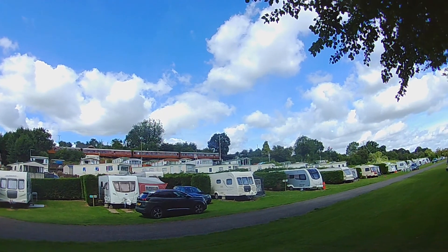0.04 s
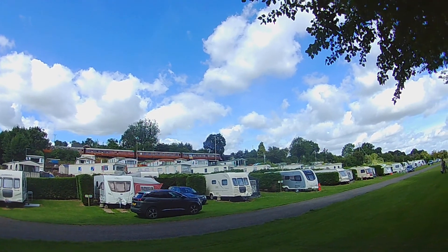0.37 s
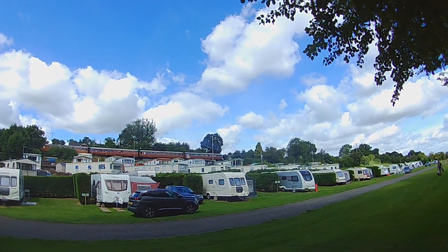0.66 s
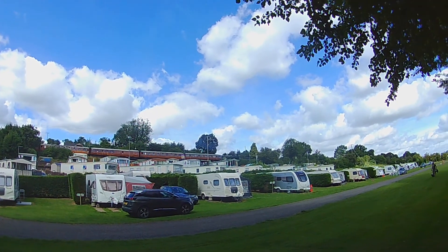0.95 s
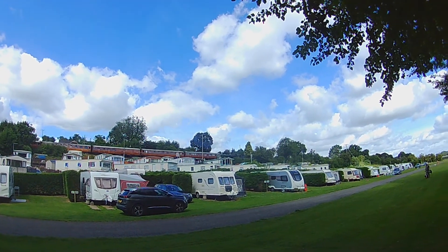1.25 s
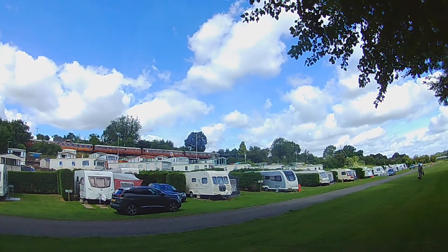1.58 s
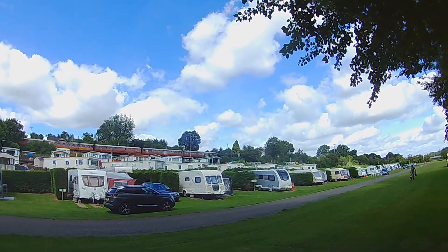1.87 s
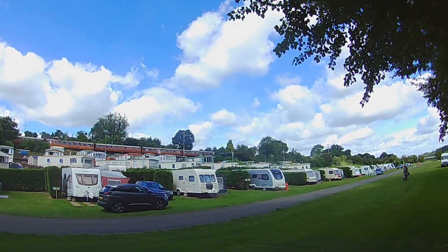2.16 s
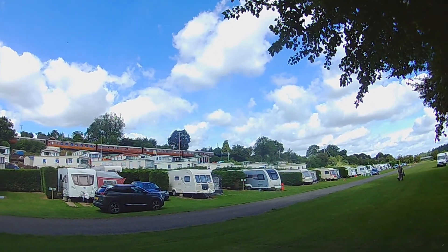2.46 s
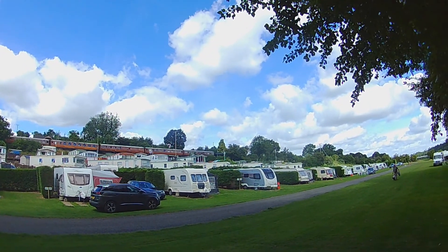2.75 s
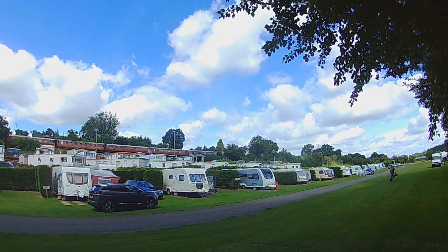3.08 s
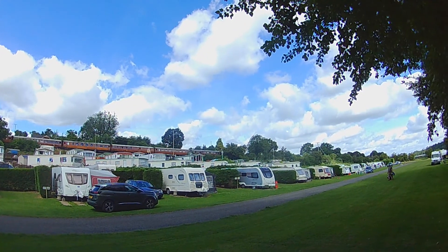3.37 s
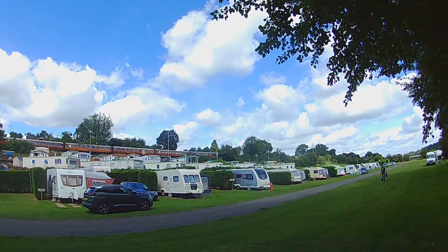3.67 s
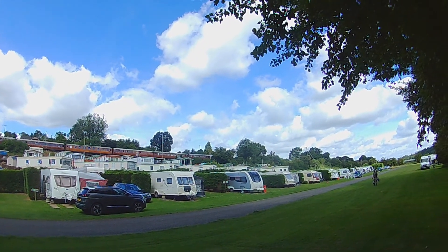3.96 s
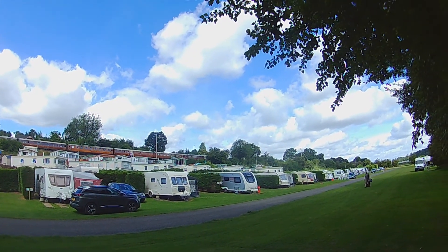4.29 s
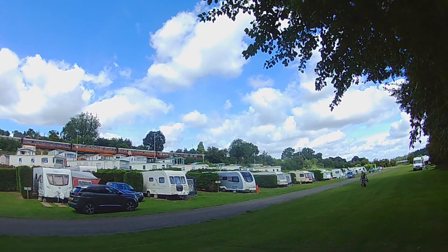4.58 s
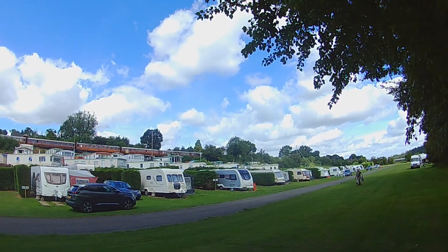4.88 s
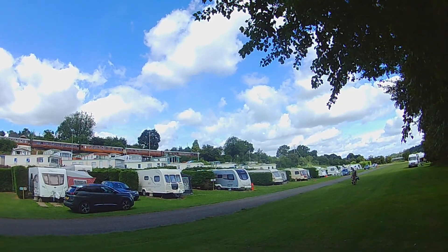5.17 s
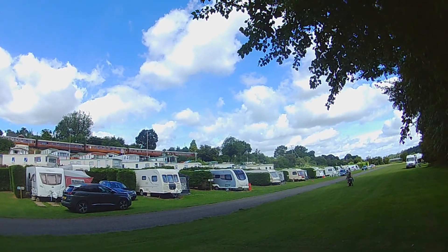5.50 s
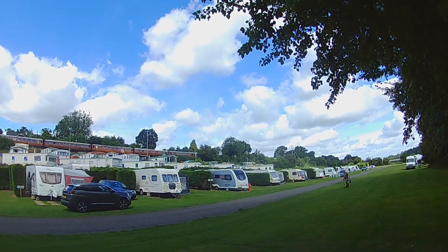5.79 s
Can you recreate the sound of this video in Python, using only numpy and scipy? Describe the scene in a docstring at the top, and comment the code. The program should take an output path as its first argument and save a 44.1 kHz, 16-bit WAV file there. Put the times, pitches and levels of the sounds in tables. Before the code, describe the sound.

A steam train passes in an open valley, chuffing rapidly over a steady wheel roar, hissing steam, thin wheel squeals and scattered clanks. About halfway through, a loud, breathy steam whistle sounds one long note and then a short toot, while the train noise dips beneath it. The whistle lingers in echoes as the chuffing comes back. A small bird and a breeze on the microphone are barely audible.

```python
"""Eight exhaust beats a second sound over the roar, squeal and clank of a passing steam train.
Each beat is a puff of steam with a boom of the chimney air. A small bird calls in a faint breeze.
Steam then drives the whistle's bell into resonance: a long blast and a short toot, which linger
as reflections in the valley. An automatic gain control lowers everything from just before the
whistle until just after it."""
import sys
import numpy as np
from scipy import signal
from scipy.fft import rfft, irfft, next_fast_len
from scipy.io import wavfile
from scipy.ndimage import uniform_filter1d, minimum_filter1d, map_coordinates

SR = 44100
rng = np.random.default_rng(int(sys.argv[2]) if len(sys.argv) > 2 else 0)


def output_pcm(signal):
    """Save a mono or channel-first signal as 16-bit PCM at the path in sys.argv[1].

    Samples are clipped to [-1, 1] before scaling.
    """
    pcm = np.clip(np.atleast_2d(signal).T, -1, 1) * 32767
    wavfile.write(sys.argv[1], SR, np.round(pcm).astype(np.int16))


N = 261943

# Spectrum of the exhaust bark and the clanks. Each row: frequency in Hz, relative density in dB.
BARK_SPECTRUM = [(100, -13.5), (220, -7.5), (330, -5.5), (500, 2), (700, -3), (900, -1.5), (1300, -1),
                 (1750, 0.5), (2100, -10), (2800, -25), (4000, -26), (5500, -39.5), (8000, -62),
                 (12000, -66)]
# Running noise. Each row: time in seconds, relative levels of wheel roar and of steam hiss in dB.
RUNNING_LEVELS = [(0, -40.5, -55), (.25, -40.5, -49.5), (.6, -38, -54), (.9, -37.5, -51), (1.6, -40, -55.5),
                  (2.2, -39, -53.5), (2.32, -37, -51), (3.2, -38, -52.5), (5.1, -40, -55),
                  (5.25, -37, -49.5), (5.94, -39.5, -57.5)]
# Pulls of the whistle cord. Each row: start, end, attack and base release T60 in seconds, level in dB.
WHISTLE_PULLS = [(2.96, 4.613, 0.056, .12, -2), (4.694, 4.892, 0.013, 0.25, -3.5)]


def amp(db):
    """Amplitude ratio of a level in decibels."""
    return 10 ** (np.asarray(db) / 20)


def unit(x):
    """The signal normalised to rms 1."""
    return x / np.sqrt(np.mean(x ** 2) + 1e-20)


def along(points, hz):
    """Interpolation of (Hz, value) points on a logarithmic frequency axis."""
    point_hz, values = np.transpose(points)
    return np.interp(np.log(hz + 1), np.log(point_hz + 1), values)


def clock():
    """The time of every sample in seconds."""
    return np.arange(N) / SR


def curves(rows):
    """Linear interpolation in time: one curve for each column after the first."""
    times, *columns = np.transpose(rows)
    return [np.interp(clock(), times, column) for column in columns]


def wobble(rate):
    """Smooth random modulation with rate knots a second."""
    coarse = np.linspace(0, N / SR, N // 20)
    knots = map_coordinates(rng.standard_normal(4096), [coarse * rate], mode="wrap")
    return np.interp(clock(), coarse, knots)


def swell(s, half):
    """A Gaussian pulse of height 1 at time s, down to 1/e at half seconds either side."""
    return np.exp(-((clock() - s) / half) ** 2)


def held(start, end, attack, t60, steep=1):
    """Attack, hold and exponential decay; steep above 1 makes the attack bite later."""
    t = clock()
    return np.clip((t - start) / attack, 0, 1) ** steep * amp(-60 * np.maximum(t - end, 0) / t60)


def bursts(times, levels_db, rise, hold, t60):
    """Envelope of bursts that rise, hold and decay; as incoherent sounds, their powers add."""
    t = np.arange(SR // 2) / SR
    shape = np.minimum(t / rise, 1) * amp(-60 * np.maximum(t - hold, 0) / t60)
    power = np.zeros(N + SR)
    for s, db in zip(times, levels_db):
        power[max(round(s * SR), 0):][:len(t)] += (amp(db) * shape) ** 2
    return np.sqrt(power[:N])


def filtered(x, response):
    """Linear filtering: the spectrum of x times a frequency response."""
    size = next_fast_len(N + SR // 2)
    return irfft(rfft(x, size) * response(np.fft.rfftfreq(size, 1 / SR)), size)[:N]


def noise(spectrum):
    """Noise of rms 1, coloured by (Hz, dB) points."""
    return unit(filtered(rng.standard_normal(N), lambda hz: amp(along(spectrum, hz))))


def partial(phase, scatter, flutter_rate, breath):
    """Multipath tone of rms 1: a direct path, paths scattered by moving air, and a breathy skirt."""
    in_phase = 1 + scatter * wobble(flutter_rate) + breath * wobble(240)
    quadrature = scatter * wobble(flutter_rate) + breath * wobble(240)
    return unit(in_phase * np.cos(phase) + quadrature * np.sin(phase))


def exhaust():
    """Each stroke releases a turbulent bark of steam and excites the chimney's air resonance."""
    # Strength of the exhaust. Each row: time in seconds, relative levels of bark and of boom in dB.
    effort = [(0, -34, -54), (.75, -32, -51), (1.35, -38, -50), (1.8, -34, -45), (2.499, -37.5, -49.5),
              (2.8, -32.5, -48.5), (3.2, -27, -50.5), (3.5, -40, -52.5), (4.6, -38.5, -47.5),
              (5.1, -41.5, -48.5), (5.3, -36, -49), (5.699, -35, -48), (5.94, -52, -59)]
    # The four beats of one turn of the driving wheels. Each row: bark accent and boom accent in dB.
    accents = [(-0.5, -2.5), (-0.5, -0.5), (2.5, 2), (-1.5, -3)]
    beat_s, ease_at_s, boom_lag_s = 0.1252, 4.98, 0.006
    beats = np.arange(int(N / SR / beat_s))
    onsets = 0.003 + beat_s * beats
    onsets += 0.07 * np.maximum(onsets - ease_at_s, 0)  # slower once the driver eases off
    accent_db = np.array(accents)[beats % len(accents)] - 0.35 * rng.standard_normal((len(beats), 2))
    times, *levels = np.transpose(effort)
    bark_db, boom_db = np.array([np.interp(onsets, times, db) for db in levels]) + accent_db.T
    puffs = bursts(onsets, bark_db, rise=0.012, hold=0.026, t60=0.26)
    bark = puffs * noise(BARK_SPECTRUM) * amp(0.55 * wobble(99) - 3.5)
    chimney_hz = 174 + 17 * wobble(40)
    boom = np.sin(2 * np.pi * np.cumsum(chimney_hz) / SR) * amp(0.75 * wobble(30) + 4)
    return bark + bursts(onsets + boom_lag_s, boom_db, rise=0.0093, hold=0.032, t60=0.23) * boom


def wheel_roar():
    """Rolling wheels radiate broadband noise."""
    # Spectrum of the roar. Each row: frequency in Hz, relative density in dB.
    roar_spectrum = [(25, -14.5), (100, -9.5), (170, -4.5), (230, -10), (510, 1.5), (730, -3.5), (870, 3),
                     (1080, -3.5), (1260, 1), (1400, -4), (1730, 0), (2080, -8.5), (2900, -26.5),
                     (9000, -64)]
    roar_db, _ = curves(RUNNING_LEVELS)
    return amp(roar_db - 1.5 + wobble(35)) * noise(roar_spectrum)


def rim_squeal():
    """On the curve the wheel rims sing in two of their natural modes."""
    # Spells of squealing. Each row: start and end in seconds, relative level in dB.
    squeals = [(-.1, 0.47, -41), (0.736, 1.285, -43.5), (2.25, 2.79, -42.5), (2.984, 5.582, -43.5)]
    envelope = sum(amp(db) * held(start, end, attack=0.13, t60=0.35) for start, end, db in squeals)
    low_mode = partial(2 * np.pi * 1262 * clock(), scatter=1.6, flutter_rate=95, breath=0.88)
    high_mode = partial(2 * np.pi * 1738 * clock(), scatter=4.8, flutter_rate=76, breath=0.87)
    return envelope * (amp(-3) * low_mode + amp(-8) * high_mode)


def steam_leak():
    """Turbulence in leaking steam makes a high hiss."""
    # Spectrum of the hiss. Each row: frequency in Hz, relative density in dB.
    hiss_spectrum = [(1200, -15.5), (2650, 5.5), (3100, -2.5), (3400, -0.5), (3600, 2), (3900, 4.5),
                     (4600, -4), (5500, -7.5), (6100, -20), (7000, -20.5), (8200, -39), (10500, -39),
                     (15000, -30)]
    _, hiss_db = curves(RUNNING_LEVELS)
    return amp(hiss_db - 2.5 + 1.3 * wobble(18)) * noise(hiss_spectrum)


def breeze():
    """Air moving past the microphone makes a faint low rumble, with one gust."""
    level_db = -71.5 + 21.5 * swell(3.65, half=0.73) + 1.5 * wobble(12)
    return amp(level_db) * noise([(20, 3.5), (60, -6.5), (110, -11), (250, -28), (1000, -77.5)])


def clanks():
    """Impacts of rods and wheels give quickly damped bursts of noise."""
    # The impacts. Each row: start in seconds, level in dB.
    impacts = [(0.136, -36), (0.222, -33), (0.65, -37.5), (0.83, -37), (0.931, -33), (1.021, -37.5),
               (1.227, -39.5), (2.134, -35), (2.4, -34.5), (2.458, -36.5), (3.094, -27), (5.391, -35),
               (5.567, -35.5), (5.705, -41)]
    return bursts(*np.transpose(impacts), rise=0.0049, hold=0.014, t60=0.079) * noise(BARK_SPECTRUM)


def bird():
    """Each thin call is a frequency-modulated tone that glides upward."""
    # The calls. Each row: start and length in seconds, first and last pitch in Hz, level in dB.
    chirps = [(1.35, 0.088, 5600, 5740, -65), (5.357, 0.12, 6230, 6573, -64)]
    calls = np.zeros(N)
    for start, length, first_hz, last_hz, db in chirps:
        progress = np.clip((clock() - start) / length, 0, 1)
        hz = first_hz + (last_hz - first_hz) * progress + 50 * wobble(120)
        calls += amp(db) * np.sin(np.pi * progress) * np.sin(2 * np.pi * np.cumsum(hz) / SR)
    return calls


def blowing(steep, linger):
    """The bell's resonance builds and decays with each pull; linger multiplies the decay time."""
    return sum(amp(db) * held(start, end, attack, t60 * linger, steep)
               for start, end, attack, t60, db in WHISTLE_PULLS)


def fade_db():
    """Atmospheric fading: the brief losses of the whistle's fundamental in moving air."""
    # The fades. Each row: centre and half length in seconds, depth in dB.
    fades = [(3.879, 0.036, 11.5), (4.274, 0.047, 3), (4.837, 0.062, 11.5)]
    return sum(depth * swell(s, half) for s, half, depth in fades)


def whistle():
    """A steam-blown bell resonates in a harmonic series whose upper partials speak a moment later."""
    # The note sharpens as steam heats the bell. Each row: time in seconds, pitch in Hz.
    pitch = [(2.988, 817), (3.012, 849), (3.04, 827.4), (3.09, 843), (3.18, 849.7), (3.3, 859.4),
             (3.49, 869.6), (3.595, 859.3), (3.75, 871), (3.95, 871), (4.15, 875), (4.4, 867),
             (4.72, 877.5), (4.97, 872)]
    # The overtones. Each row: harmonic number, base level in dB against the fundamental.
    overtones = [(2, -17), (3, -14.5), (4, -19), (5, -29), (6, -34), (7, -42.5), (8, -50), (9, -58.5),
                 (10, -61), (11, -64.5), (12, -68.5)]
    # Swings of the second harmonic. Each row: time in seconds, gain in dB.
    second_gain = [(3, -4), (3.07, 4), (3.21, -5), (3.29, 7), (3.42, -3), (3.57, 0), (3.63, -12), (3.73, 5),
                   (3.85, 2), (3.95, -7), (4.12, 1), (4.56, -5), (4.72, 4)]
    # Swings of the harmonics from the third up. Each row: time in seconds, gain in dB.
    brightness = [(3, -4.5), (3.19, 2), (3.55, -7.5), (3.67, -3), (3.89, -24), (4.06, -10.5), (4.27, -16.5),
                  (4.5, -4.5), (4.7, -12.5), (4.97, -17)]
    ragged = np.interp(clock(), [3.35, 4], [0.38, 1.15])  # grows as the engine draws away
    hz = curves(pitch)[0] * (1 + 0.0022 * ragged * wobble(55))  # unsteady steam wavers the pitch
    phase = 2 * np.pi * np.cumsum(hz) / SR
    fundamental = partial(phase, scatter=0.1 * ragged, flutter_rate=93, breath=0.0097)
    tone = blowing(steep=0.75, linger=0.96) * amp(-fade_db()) * fundamental
    second_db = curves(second_gain)[0]
    second = blowing(steep=0.85, linger=1.8) * amp(second_db)
    upper = blowing(steep=4.2, linger=1.5) * amp(curves(brightness)[0])
    third = upper * amp(-0.4 * second_db)  # rises as the second falls
    envelopes = [second, third] + [upper] * (len(overtones) - 2)
    dulling_db = 0.35 * np.maximum(clock() - WHISTLE_PULLS[0][0], 0)  # distance takes the treble
    for (k, db), envelope in zip(overtones, envelopes):
        scatter = ragged * (0.27 + 0.086 * k)
        breath = ragged * 0.043 + 0.047 * k
        level_db = db + 1.5 * wobble(13) - dulling_db * max(k - 3, 0)
        tone += envelope * amp(level_db) * partial(k * phase, scatter, flutter_rate=53, breath=breath)
    return tone


def steam_jet():
    """The turbulent jet that drives the whistle adds a rush of noise."""
    # Spectrum of the jet. Each row: frequency in Hz, relative density in dB.
    jet_spectrum = [(200, -16), (500, -10), (850, 9.5), (1000, -2), (1250, 1), (1750, 4.5), (2300, -5),
                    (3100, -8), (4200, -10), (5400, -19.5), (6600, -27.5), (7400, -33.5), (8500, -39.5),
                    (12000, -47.5), (15500, -41)]
    # Wet steam spits in the cold whistle. Each row: centre and half length in seconds, boost in dB.
    spits = [(3.078, 0.06, 8), (3.28, 0.034, 5.5)]
    valve = sum(held(start, end, attack, t60 * 3.3, steep=4.7)
                for start, end, attack, t60, _ in WHISTLE_PULLS)
    spit_db = sum(db * swell(s, half) for s, half, db in spits)
    level_db = -29.5 + spit_db - 0.18 * fade_db() + 1.5 * wobble(40)
    return valve * amp(level_db) * noise(jet_spectrum)


def valley(x):
    """Reverberation: diffuse reflections from hillsides and woods decay at each band's own rate."""
    # Reverberation times. Each row: frequency in Hz, T60 in seconds.
    decay_times = [(800, 4), (1800, 6.5), (2600, 2.5), (8000, 0.5)]
    # Strength of the reverberation. Each row: frequency in Hz, gain in dB.
    band_gains = [(850, -19), (1750, -18.5), (2600, -17), (3500, -15.5), (7000, -6)]
    hz, t, noise_bands = signal.stft(rng.standard_normal(3 * SR), SR, nperseg=256)
    decay = amp(-60 * t / along(decay_times, hz)[:, None])
    decay *= amp(along(band_gains, hz))[:, None] / np.sqrt(np.mean(decay ** 2, axis=1, keepdims=True))
    tail = signal.istft(noise_bands * decay, SR, nperseg=256)[1]
    return signal.fftconvolve(x, tail / np.sqrt(len(tail)))[:N]


def hillside(x, delay_s=0.77, gain_db=-30, cutoff_hz=2500):
    """A single reflection from the far slope returns as a late, dull echo."""
    delayed = np.interp(clock() - delay_s, clock(), x, left=0)
    return amp(gain_db) * filtered(delayed, lambda hz: 1 / (1 + (hz / cutoff_hz) ** 2))


def hoots():
    """As the valve shuts, the steam pressure collapses and the bell sounds flat for an instant."""
    # The hoots. Each row: centre and half length in seconds, pitch in Hz, level in dB.
    flat_notes = [(4.63, 0.0085, 817, -7), (4.878, 0.012, 830, -8)]
    return sum(amp(db) * swell(s, half) * np.sin(2 * np.pi * hz * (clock() - s))
               for s, half, hz, db in flat_notes)


def scene():
    """Superposition of the train, the breeze, the bird and the whistle with its reflections."""
    train = exhaust() + wheel_roar() + rim_squeal() + steam_leak() + clanks()
    tone = whistle() + hoots()
    return (train + tone + valley(tone) + hillside(tone) + steam_jet() + bird() + breeze())[None]


def gain_control(x, threshold_db, depth_db, ahead_s, hold_s, glide_s):
    """Compression: the gain drops ahead of loud sound, by depth_db at most, holds and recovers."""
    level_db = 10 * np.log10(np.abs(uniform_filter1d(x ** 2, SR // 50)) + 1e-12)
    needed_db = np.clip(threshold_db - level_db, -depth_db, 0)
    size = round((ahead_s + hold_s) * SR)
    held_db = minimum_filter1d(needed_db, size, origin=round(hold_s * SR) - size // 2)
    return x * amp(uniform_filter1d(held_db, round(glide_s * SR)))


def limiter(x, ceiling):
    """Peak limiting: a smooth gain holds the waveform under the ceiling."""
    size = SR // 40
    needed = ceiling / np.maximum(np.abs(x), ceiling)
    return x * uniform_filter1d(minimum_filter1d(needed, size), size)


def record(dry):
    """Gain control and limiting narrow the dynamic range; a low-pass filter limits the bandwidth."""
    ducked = gain_control(dry[0], threshold_db=-15.5, depth_db=10.5,
                          ahead_s=0.16, hold_s=0.268, glide_s=0.13)
    limited = limiter(ducked, ceiling=0.48)
    return filtered(limited, lambda hz: hz < 15750)[None]


dry = scene()
out = record(dry)
output_pcm(out)
```